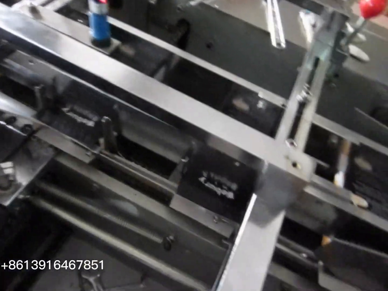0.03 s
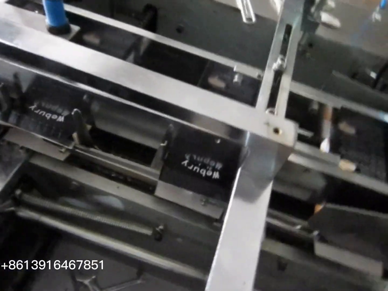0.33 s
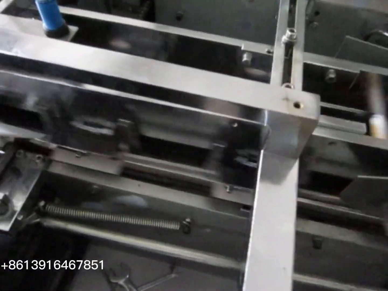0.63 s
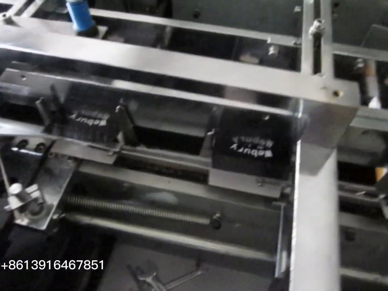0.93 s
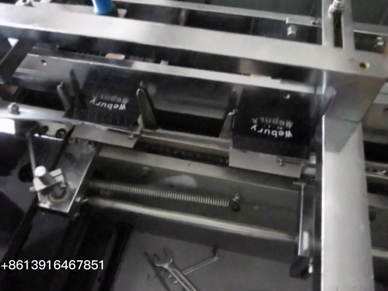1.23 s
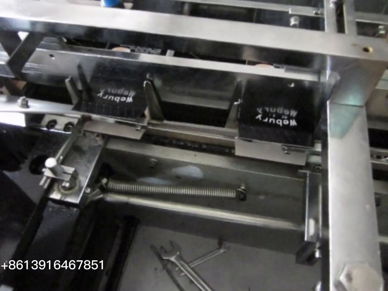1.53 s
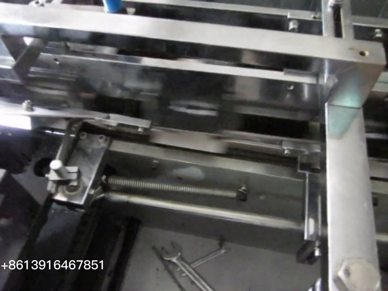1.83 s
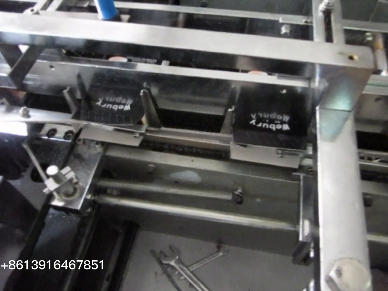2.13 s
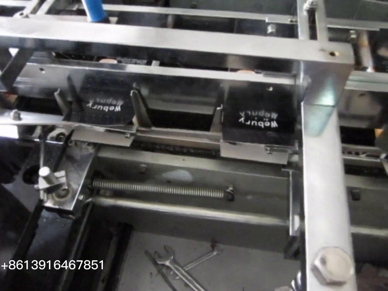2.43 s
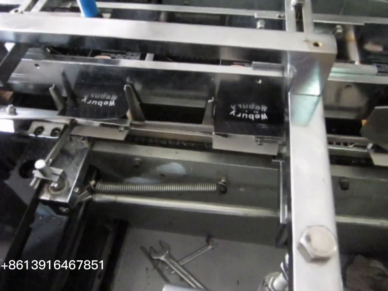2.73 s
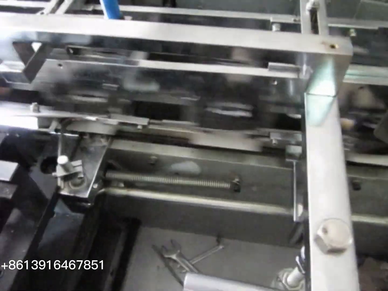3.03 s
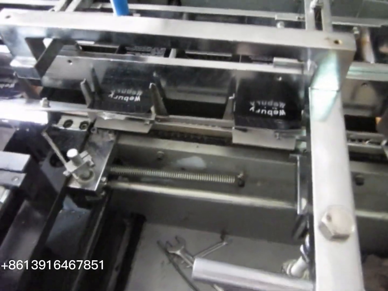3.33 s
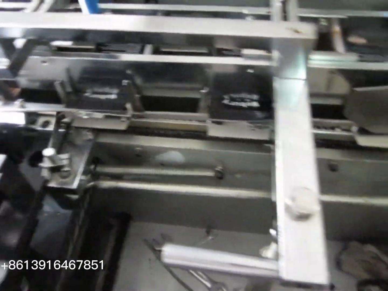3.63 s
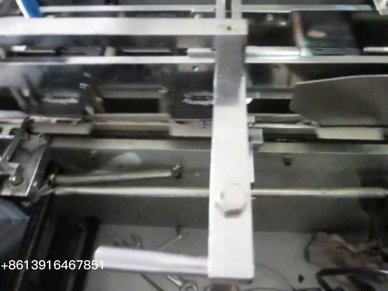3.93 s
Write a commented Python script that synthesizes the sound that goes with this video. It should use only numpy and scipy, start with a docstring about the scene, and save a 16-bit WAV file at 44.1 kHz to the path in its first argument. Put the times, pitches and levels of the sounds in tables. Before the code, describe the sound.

A packaging machine runs close by in a factory hall, its chain rattling and scraping along ringing steel guides. About once a second it brakes with knocks, clicks through a short pause, then clunks back into motion.

```python
"""A cartoning machine indexes about once every 1.1 s in a factory hall, over the rumble of its drive.
It opens mid-stroke: the chain rattles and jingles, pushers scrape along ringing steel guides, parts
squeal and card scuffs. Knocks land, the dry guide rasps at full speed and the frame shudders.
The chain judders as it brakes, a part creaks, and levers click through the rest. Then the chain
takes up its slack with a clunk and runs again, three times over, the last stroke still going at the end."""
import sys
import numpy as np
from scipy import signal
from scipy.fft import rfft, irfft
from scipy.io import wavfile
from scipy.ndimage import uniform_filter1d

SR = 44100
rng = np.random.default_rng(int(sys.argv[2]) if len(sys.argv) > 2 else 0)


def generate_wav(signal):
    """Clip the signal to [-1, 1] and save it as 16-bit WAV at the path in sys.argv[1]."""
    frames = np.transpose(np.atleast_2d(signal))
    scaled = np.clip(frames, -1, 1) * 32767
    pcm = np.round(scaled).astype(np.int16)
    wavfile.write(sys.argv[1], SR, pcm)


N = 176400
TIME = np.arange(N) / SR


def amp(db):
    """Decibels to gain."""
    return 10 ** (np.asarray(db) / 20)


def unit_rms(x):
    """Scales to rms 1."""
    return x / np.sqrt(np.mean(x ** 2) + 1e-20)


def curve_at(points, hz):
    """Reads a curve on a log-frequency axis."""
    f, value = np.transpose(points)
    return np.interp(np.log(hz + 1), np.log(f), value)


def add(mix, start, sound):
    """Mixes a sound in at start seconds."""
    part = mix[max(round(start * SR), 0):][:len(sound)]
    part += sound[:len(part)]


def eq(x, points, size=4096):
    """Minimum-phase filter of unit energy, shaped by an EQ curve."""
    hz = abs(np.fft.fftfreq(size, 1 / SR))
    log_gain = np.log(amp(curve_at(points, hz)))
    response = np.exp(np.conj(signal.hilbert(log_gain)))
    taps = np.fft.ifft(response).real[:size // 2]
    return signal.oaconvolve(x, taps / np.linalg.norm(taps))[:len(x)]


def ring(x, modes):
    """Resonator bank of unit energy; a mode's level sets its share."""
    t = np.arange(SR // 3) / SR
    body = sum(amp(db - 60 * t / t60) / np.sqrt(t60) * np.cos(2 * np.pi * hz * t)
               for hz, db, t60 in modes)
    return signal.oaconvolve(x, body / np.linalg.norm(body))[:len(x)]


def grit(per_s, spread_db, clump_db, clump_hz):
    """Tiny random impacts of uneven size that arrive in clumps, at rms 1."""
    size = amp(spread_db * np.minimum(rng.exponential(1, N), 3)) * rng.choice([-1, 1], N)
    ratio = np.fft.rfftfreq(N, 1 / SR) / clump_hz
    clumps = unit_rms(irfft(rfft(rng.standard_normal(N)) * ratio / (1 + ratio ** 2) ** 1.8, N))
    hits = rng.random(N) < per_s / SR
    return unit_rms(size * hits * amp(clump_db * np.clip(clumps, -2, 2)))


def swell(centre, half):
    """Bell-shaped envelope, down to 1/e at half seconds from its centre."""
    return np.exp(-np.minimum(((TIME - centre) / half) ** 2, 60))


def wander(samples):
    """Smooth random motion of rms 1, changing over that many samples."""
    return unit_rms(uniform_filter1d(uniform_filter1d(rng.standard_normal(N), samples), samples))


def sing(hz, jitter):
    """Stick-slip tone of rms 1 on an unsteady pitch."""
    pitch = hz * (1 + jitter * wander(samples=100))
    return unit_rms(np.sin(2 * np.pi * np.cumsum(pitch) / SR))


def chatter(cues, decay_s):
    """The attack of each hit: a quickly dying chatter of metal contacts."""
    out, t = np.zeros(N), np.arange(SR // 10) / SR
    for start, db, *_ in cues:
        add(out, start, amp(db) * np.exp(-t / decay_s) * rng.choice([-1, 1], len(t)))
    return out


def struck_spot(cues, ring_db=-3, decay_s=.009):
    """The tone of each hit: the spot it lands on rings for a few cycles."""
    out, t = np.zeros(N), np.arange(SR // 10) / SR
    for start, db, hz in cues:
        add(out, start, 2 * amp(db + ring_db) * np.exp(-t / decay_s) * np.sin(2 * np.pi * hz * t))
    return out


# EQ of the drive bed (f/Hz, level/dB)
DRIVE_EQ = [(20, -23), (36, -15.5), (50, -8), (75, -7.5), (128, 2), (165, -11), (205, 2), (270, -5.5),
            (320, 1.5), (410, -8), (520, -7.5), (620, -3), (700, -4), (790, -3.5), (950, -7), (1300, -9),
            (1700, -11.5), (2900, -12.5), (3800, -14), (5300, -19.5), (6200, -26), (7100, -42)]


def drive(gain_db=-39.5):
    """The bed: steady rumble and fine ticking of the drive."""
    return amp(gain_db) * eq(grit(per_s=7000, spread_db=3.5, clump_db=-0.5, clump_hz=30), DRIVE_EQ)


# conveyor cues with a trim per layer (start t/s, stop t/s, rattle, scrape and judder level/dB)
STROKES = [(-.073, 0.708, -4, -3, -2.5), (1.068, 1.837, 0.5, -0.06, -5), (2.193, 3.001, 1.4, 1.5, -6.5),
           (3.319, 4.13, 0.2, -0.4, -4)]
# fader ride within a stroke (t/s from its start, rattle level/dB, scrape level/dB)
STROKE_RIDE = [(0, -10.5, -16), (.08, -6, -6), (.2, -7, -2.5), (0.291, -5.5, -0.5), (.35, 0, -0.5),
               (0.449, -2, 0), (0.551, -1.5, -4), (.63, -1, -1.5), (.8, -5, -8.5)]
TAKE_UP_S, BRAKE_FULL_S, BRAKE_RISE_S = 0.0068, 0.619, 0.059
RATTLE_FALL_DB_PER_S, SCRAPE_FALL_DB_PER_S, JUDDER_FALL_DB_PER_S = 411, 124, 415.5


def conveyor_envelopes():
    """Rattle, scrape and judder envelopes as the conveyor starts, runs, brakes and stops."""
    ride_s, rattle_ride, scrape_ride = np.transpose(STROKE_RIDE)
    rattle, scrape, judder = np.zeros((3, N))
    for start, stop, rattle_trim, scrape_trim, judder_trim in STROKES:
        t = TIME - start
        stopped_s = np.maximum(TIME - stop, 0)
        moving = np.clip(1 + t / TAKE_UP_S, 0, 1)
        braking = np.clip(1 + (t - BRAKE_FULL_S) / BRAKE_RISE_S, 0, 1)
        rattle_db = rattle_trim + np.interp(t, ride_s, rattle_ride)
        scrape_db = scrape_trim + np.interp(t, ride_s, scrape_ride)
        rattle += moving * amp(rattle_db - RATTLE_FALL_DB_PER_S * stopped_s)
        scrape += moving * amp(scrape_db - SCRAPE_FALL_DB_PER_S * stopped_s)
        judder += braking * amp(judder_trim - JUDDER_FALL_DB_PER_S * stopped_s)
    return rattle, scrape, judder


# EQs of the running rattle and the boxy braking judder (f/Hz, level/dB)
RATTLE_EQ = [(20, -35), (38, -30), (50, -13), (80, -8.5), (130, 2), (165, 0.5), (230, 4), (420, 2),
             (720, 3), (1200, 0), (2000, -5), (3000, -6.5), (5000, -15), (6000, -11.5), (7100, -31.5)]
JUDDER_EQ = [(20, -39), (50, -7.5), (85, -5), (130, 3), (165, -2), (220, -6), (310, 10.5), (400, -13.5),
             (540, 0), (690, 5), (950, -2), (1500, -13.5), (3000, -4), (7100, -55)]
# low body of the machine frame (f/Hz, level/dB, t60/s)
FRAME_MODES = [(132, -7, 0.076), (197, 8.5, 0.4), (238.8, 8.5, 0.87), (305, -7, 0.24), (650, -6.5, .08),
               (658, -10.5, 0.11), (790, -15, .09), (730, -7, 0.074), (970, -17, .04), (1095, 8.5, 0.051)]


def chain(rattle, judder, rattle_db=-32, judder_db=-29, frame_db=-10.5):
    """Links clatter in their track and shake the frame as they brake."""
    links = amp(rattle_db) * rattle * grit(per_s=3700, spread_db=4, clump_db=0, clump_hz=50)
    shakes = amp(judder_db) * judder * grit(per_s=1500, spread_db=1.5, clump_db=1, clump_hz=50)
    body = amp(frame_db) * ring(links + shakes, FRAME_MODES)
    return eq(links, RATTLE_EQ) + eq(shakes, JUDDER_EQ) + body


# EQ of the steel scrape (f/Hz, level/dB)
SCRAPE_EQ = [(20, -51.5), (500, -4), (1200, -1.5), (1850, 0), (2200, -4), (2650, -5.5), (3100, -2),
             (3600, -1), (4000, -1.5), (4400, -5), (5200, -8), (6000, -17), (7100, -30.5)]
# bright ring of the steel guides (f/Hz, level/dB, t60/s)
GUIDE_MODES = [(1280, -11, 0.21), (1520, -3, 0.16), (1565, 8, 0.084), (1885, 0, 0.64), (1910, -10.5, 0.14),
               (2240, -34.5, 0.17), (3200, -6.5, 0.13), (3320, -3, .1), (3280, 2.5, 0.033),
               (3570, -3, 0.088), (3600, 1.5, 0.056), (3960, -17, 0.038), (4200, -7.5, .1),
               (4600, -1, 0.31)]


def guides(scrape, scrape_db=-31.5, ring_db=-49.5):
    """Pushers scrape along the steel guides and make them ring."""
    grains = scrape * grit(per_s=7000, spread_db=0, clump_db=1, clump_hz=60)
    return amp(scrape_db) * eq(grains, SCRAPE_EQ) + amp(ring_db) * ring(grains, GUIDE_MODES)


# balance of the jingle across its pitches (f/Hz, level/dB)
JINGLE_BALANCE = [(1000, -1), (1500, 1), (1900, 2.5), (2600, -1.5), (3100, -2), (3650, -1), (4300, -9.5)]


def jingles(scrape, voices=60, strikes_per_s=300, t60=.06, gain_db=-36.5):
    """Loose links and rollers strike at random as the chain runs, each pinging at its own pitch."""
    out, t = np.zeros(N), np.arange(SR // 10) / SR
    pitches = np.linspace(JINGLE_BALANCE[0][0], JINGLE_BALANCE[-1][0], voices)
    for hz in pitches * rng.uniform(.98, 1.02, voices):
        strikes = (rng.random(N) < strikes_per_s / voices / SR) * rng.uniform(0.6, 1, N)
        ping = amp(curve_at(JINGLE_BALANCE, hz) - 60 * t / t60) * np.sin(2 * np.pi * hz * t)
        out += signal.oaconvolve(strikes, ping)[:N]
    return amp(gain_db) * scrape * unit_rms(out)


# hoarse squeals of rubbing parts (centre t/s, half length/s, f/Hz, level/dB)
SQUEALS = [(.02, 0.23, 2960, -39), (0.38, 0.13, 2270, -33.5), (1.586, 0.034, 1920, -28),
           (2.71, 0.029, 1920, -32.5), (3.702, 0.063, 3820, -39.5)]


def squeals(t60=.012):
    """Slipping contact excites one broad resonance for a moment."""
    slips = grit(per_s=3800, spread_db=4.5, clump_db=1.5, clump_hz=60)
    return sum(amp(db) * swell(centre, half) * ring(slips, [(hz, 0, t60)])
               for centre, half, hz, db in SQUEALS)


# card scuff cues (centre t/s, half length/s, level/dB)
SCUFFS = [(0.02, 0.1, -36.5), (0.349, 0.056, -29.5), (0.502, 0.045, -28.5), (0.781, 0.031, -34.5),
          (0.814, 0.14, -40), (1.105, 0.042, -38.5), (1.634, 0.052, -27), (1.787, 0.024, -31),
          (1.896, 0.037, -33.5), (2.236, 0.086, -37), (3.043, 0.0098, -35), (3.296, 0.017, -36.5),
          (3.372, 0.046, -33)]
# papery EQ of the card (f/Hz, level/dB)
CARD_EQ = [(20, -37), (300, -2.5), (900, -1), (1800, -5.5), (3500, -4), (5300, -9), (7100, -26)]


def scuffs():
    """Card rubs against the pushers in short swells of gritty friction."""
    level = sum(amp(db) * swell(centre, half) for centre, half, db in SCUFFS)
    return eq(level * grit(per_s=6000, spread_db=4, clump_db=2, clump_hz=70), CARD_EQ)


# heavy hits of chain and pushers (t/s, level/dB, struck spot f/Hz)
KNOCKS = [(.092, -36, 605), (.6, -23.5, 610), (.606, -24.5, 1245), (.64, -28.5, 720), (.656, -27.5, 935),
          (.686, -23, 706), (1.408, -27, 1135), (1.724, -24, 703), (1.762, -26.5, 716), (1.772, -25, 690),
          (1.795, -25.5, 653), (1.82, -25.5, 746), (2.532, -29, 756), (2.594, -35, 764), (2.838, -23, 642),
          (2.885, -27.5, 986), (2.912, -27, 238), (3.031, -33.5, 303), (3.139, -37, 630), (3.191, -36, 674),
          (3.653, -26.5, 630), (3.72, -26.5, 690), (3.769, -29.5, 606), (3.957, -24, 660)]
# EQ of a knock's attack (f/Hz, level/dB)
KNOCK_EQ = [(20, -29), (60, -2.5), (200, 3), (310, 4.5), (450, 0.5), (720, -0.5), (1200, 1), (2500, -9),
            (5000, -9.5), (7100, -27.5)]


def knocks(frame_db=-12):
    """Chain and pushers knock, ringing the struck spot and the frame."""
    attack = chatter(KNOCKS, decay_s=.01)
    return struck_spot(KNOCKS) + eq(attack, KNOCK_EQ) + amp(frame_db) * ring(attack, FRAME_MODES)


# dry guide cues (start t/s, end t/s, rasp level/dB, singing f/Hz, singing level/dB)
RASPS = [(0.323, .61, -35.5, 3530, -36), (1.3, 1.7, -36.5, 3620, -39), (2.392, 2.8, -37, 3565, -39.5),
         (3.51, 3.93, -40, 3687, -37.5)]
# harsh resonances of the rasp (f/Hz, level/dB, t60/s)
RASP_MODES = [(1448, 1.5, 0.33), (1810, -6, 0.11), (1814, -4, 0.2), (2990, -12, 0.078), (3320, 0, .03),
              (3480, 0.5, .025), (3570, -2.5, 0.033), (3530, -2.5, .035), (3780, -6, .04),
              (3870, -14.5, .03), (3960, -23, 0.076)]


def rasps(fade_s=0.26, flicker_db=3):
    """At full speed the pushers stick and slip, and the guide sings hoarsely."""
    level, song = np.zeros((2, N))
    for start, end, rasp_db, hz, sing_db in RASPS:
        # the fades are centred on the start and the end
        contact = np.clip(.5 + np.minimum(TIME - start, end - TIME) / fade_s, 0, 1)
        tone = sing(hz, jitter=.024) * amp(flicker_db * wander(samples=350))
        level += amp(rasp_db) * contact
        song += amp(sing_db) * contact * unit_rms(tone)
    slips = level * grit(per_s=3400, spread_db=2.5, clump_db=3, clump_hz=45)
    return song + ring(slips, RASP_MODES)


# low swells in the frame (centre t/s, half length/s, level/dB)
THRUMS = [(.52, .07, -46), (1.328, .14, -49.5), (2.684, .15, -48), (3.776, .15, -47.5)]
# sub-heavy EQ of the thrum (f/Hz, level/dB)
THRUM_EQ = [(20, -40.5), (36, -17), (48, 0), (62, -7.5), (90, -15), (200, -42), (1000, -70.5)]


def thrums():
    """The frame shudders under load."""
    level = sum(amp(db) * swell(centre, half) for centre, half, db in THRUMS)
    return level * eq(rng.standard_normal(N), THRUM_EQ)


# lever and stop cues (t/s, level/dB)
CLICKS = [(.5, -26.5), (.718, -22.5), (.724, -25), (.773, -45), (1.014, -31), (1.173, -24), (1.261, -23.5),
          (1.475, -23), (1.836, -17.5), (1.861, -25.5), (1.89, -22.5), (1.918, -27.5), (1.951, -27.5),
          (2.589, -29.5), (2.728, -25), (2.74, -17), (2.85, -27), (2.925, -21), (2.957, -20), (2.964, -30),
          (3.004, -22), (3.011, -19), (3.86, -22.5), (3.919, -26), (3.959, -21)]
# crisp EQ of a click (f/Hz, level/dB)
CLICK_EQ = [(20, -45), (200, -3.5), (800, -1), (1600, 5), (2500, 6), (3100, 7), (3800, 5.5), (4500, -2),
            (5500, -3), (6400, -9), (7100, -24.5)]


def clicks(ring_db=-16):
    """Levers and stops click sharply and ring the guides."""
    attack = chatter(CLICKS, decay_s=.002)
    return eq(attack, CLICK_EQ) + amp(ring_db) * ring(attack, GUIDE_MODES)


# creak accents (centre t/s, half length/s, f/Hz, glide/(Hz/s), level/dB)
CREAKS = [(0.719, .006, 3090, -1, -28.5), (1.072, 0.0031, 823, -2.5, -36),
          (1.106, 0.0094, 875, 3001.5, -34), (1.125, 0.01, 968, -8000, -34), (1.174, 0.002, 1650, -5, -31)]


def creaks():
    """A part coming under load slips and sings briefly on a gliding pitch."""
    return sum(amp(db) * swell(centre, half) * sing(hz + glide * (TIME - centre), jitter=.07)
               for centre, half, hz, glide, db in CREAKS)


# take-up hits (t/s, level/dB, struck spot f/Hz)
CLUNKS = [(1.067, -30.5, 652), (1.094, -35, 846), (1.188, -36.5, 696), (2.205, -28.5, 476),
          (2.212, -33.5, 880), (2.228, -31, 1100), (3.333, -30.5, 234), (3.352, -30.5, 710),
          (3.372, -31, 1190)]
# dull, weighty EQ of a clunk (f/Hz, level/dB)
CLUNK_EQ = [(20, -37), (120, 3.5), (250, 2.5), (480, -3), (900, 1), (1400, 0.5), (2500, -4.5), (5000, -14),
            (7100, -47)]


def clunks():
    """The chain takes up its slack at the start of a stroke."""
    return eq(chatter(CLUNKS, decay_s=.021), CLUNK_EQ) + struck_spot(CLUNKS)


# reverb time of the hall (f/Hz, t60/s)
HALL_DECAY = [(100, 0.11), (1000, 0.41), (7000, 0.14)]


def hall(x, reflections_per_s=2500):
    """Sparse reflections, each band dying at its own speed."""
    taps = rng.standard_normal(SR // 2) * (rng.random(SR // 2) < reflections_per_s / SR)
    hz, t, bands = signal.stft(taps, SR, nperseg=256)
    decay = amp(-60 * t / curve_at(HALL_DECAY, hz)[:, None])
    tail = signal.istft(bands * decay, SR)[1]
    return signal.oaconvolve(x, tail / np.linalg.norm(tail))[:N]


def scene(reverb_db=-14.5):
    """The machine close up, with the hall around it, in mono."""
    rattle, scrape, judder = conveyor_envelopes()
    conveyor = chain(rattle, judder) + guides(scrape) + jingles(scrape)
    friction = rasps() + squeals() + creaks()
    hits = clunks() + knocks() + clicks()
    machine = conveyor + friction + hits + scuffs() + thrums() + drive()
    return (machine + amp(reverb_db) * hall(machine))[None]


def record(dry):
    """A steep high cut at 7100 Hz on the whole mix."""
    high_cut = signal.firwin(1023, 7100, window=("kaiser", 9), fs=SR)
    return signal.oaconvolve(dry, high_cut[None], "same")


dry = scene()
out = record(dry)
generate_wav(out)
```